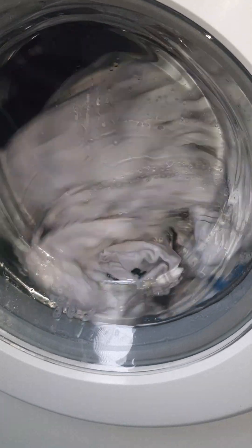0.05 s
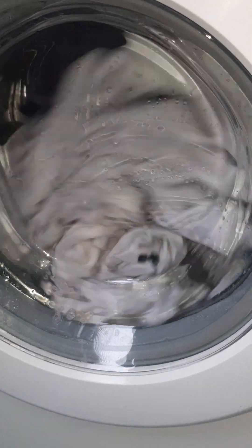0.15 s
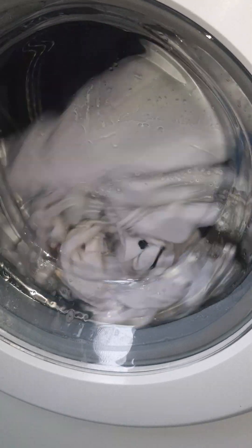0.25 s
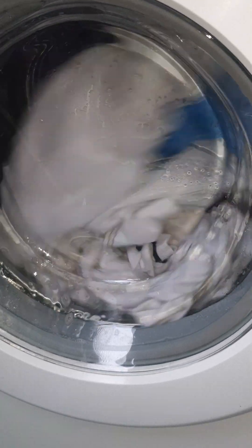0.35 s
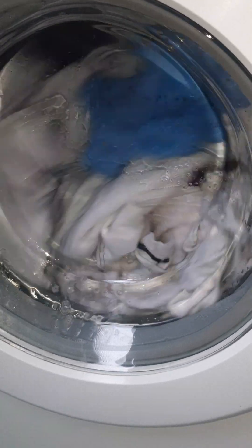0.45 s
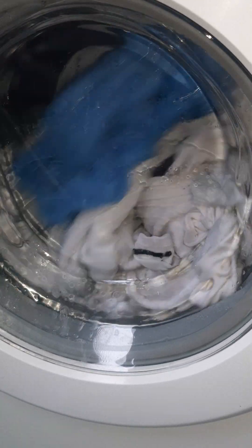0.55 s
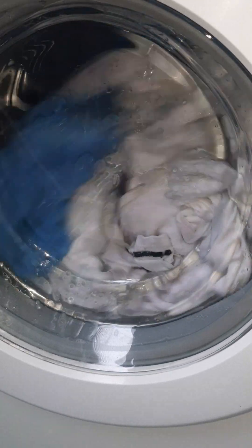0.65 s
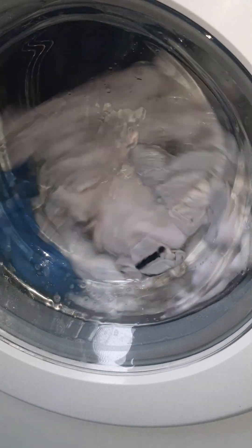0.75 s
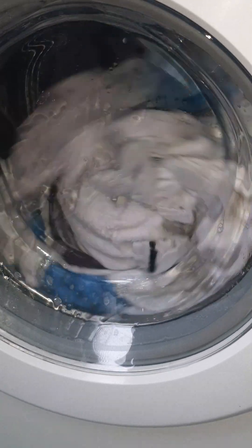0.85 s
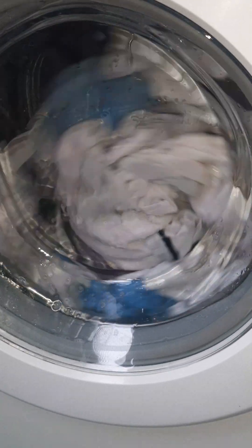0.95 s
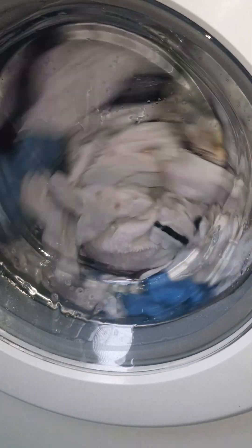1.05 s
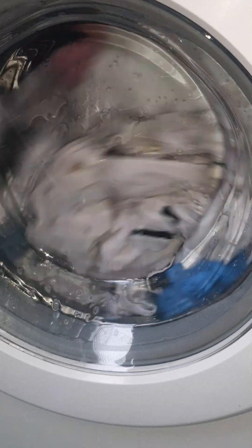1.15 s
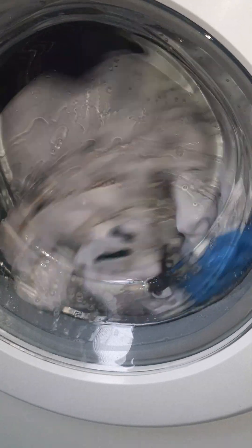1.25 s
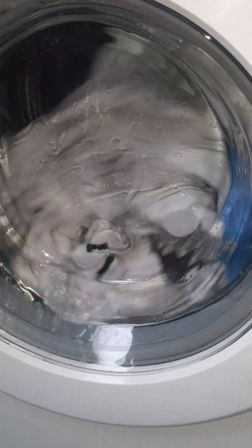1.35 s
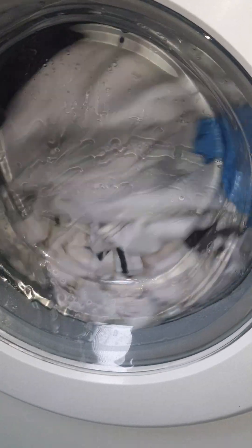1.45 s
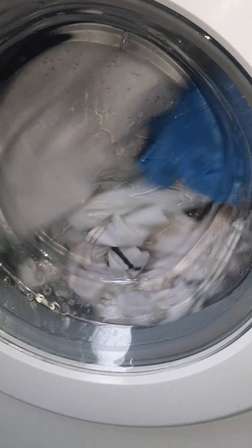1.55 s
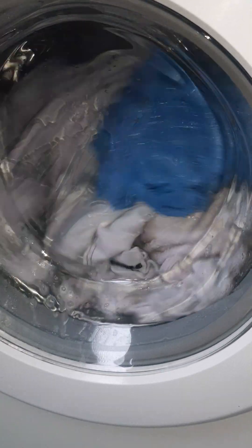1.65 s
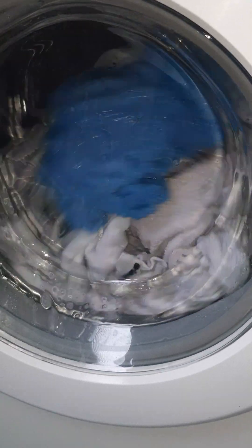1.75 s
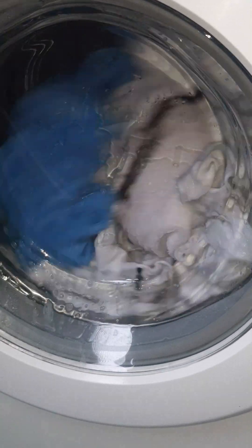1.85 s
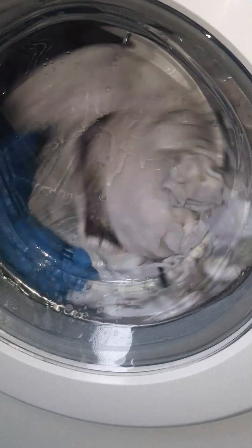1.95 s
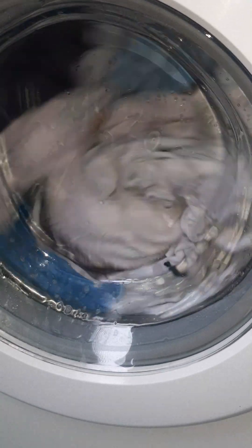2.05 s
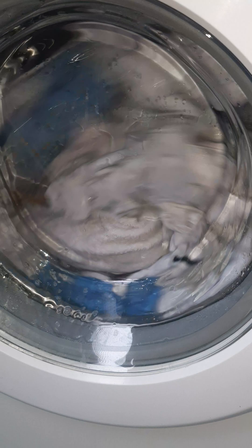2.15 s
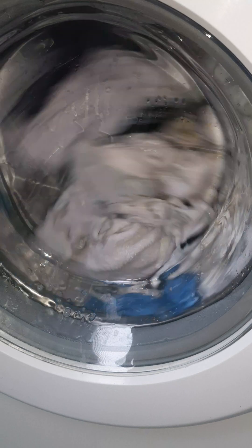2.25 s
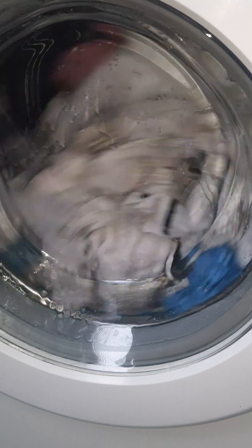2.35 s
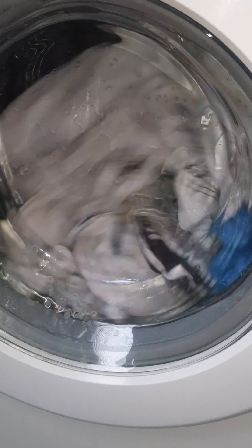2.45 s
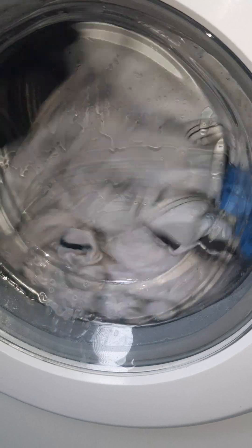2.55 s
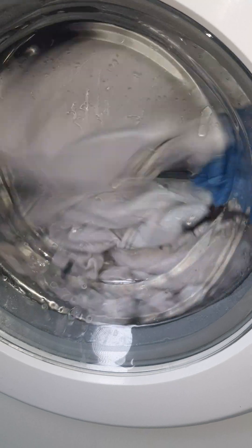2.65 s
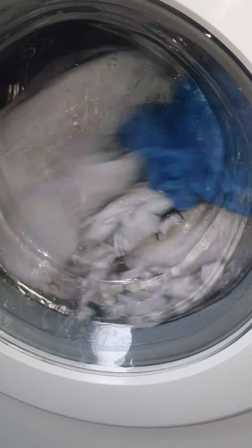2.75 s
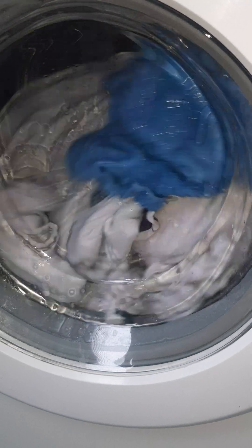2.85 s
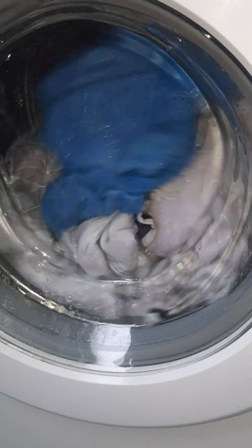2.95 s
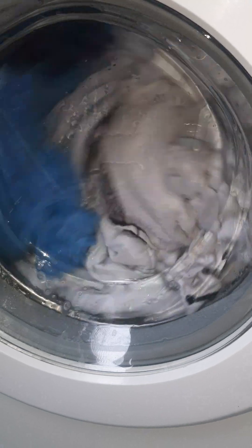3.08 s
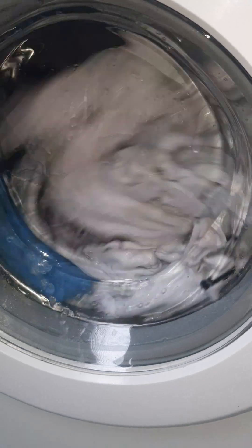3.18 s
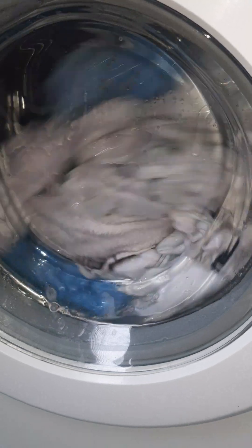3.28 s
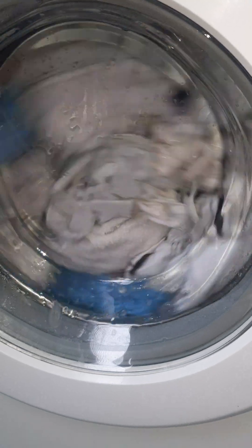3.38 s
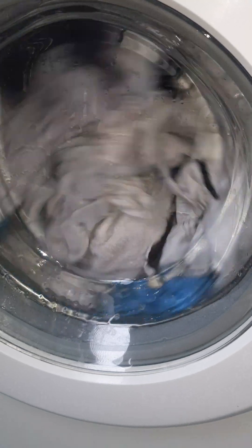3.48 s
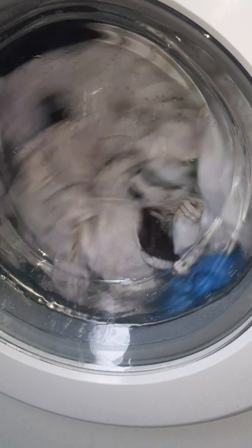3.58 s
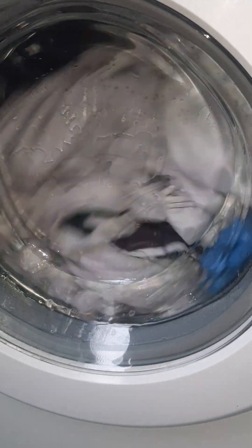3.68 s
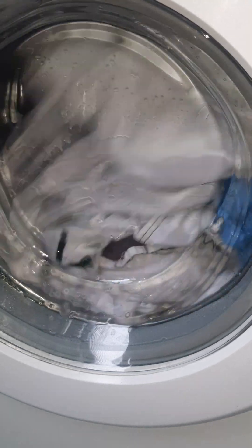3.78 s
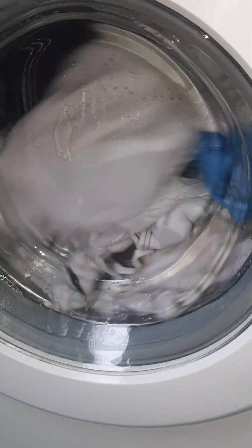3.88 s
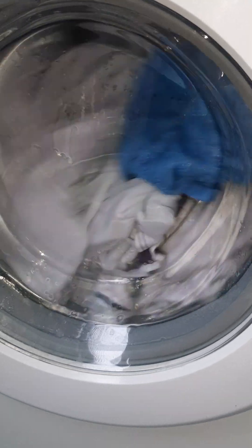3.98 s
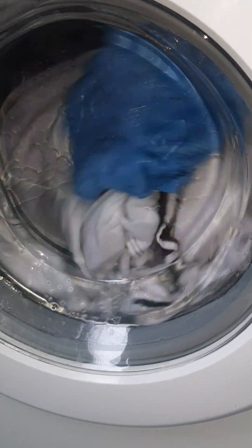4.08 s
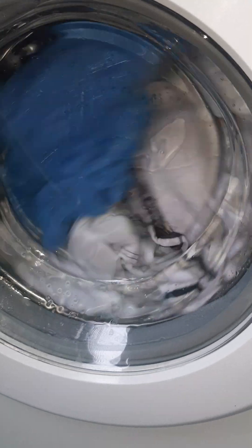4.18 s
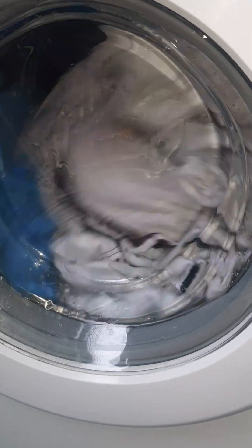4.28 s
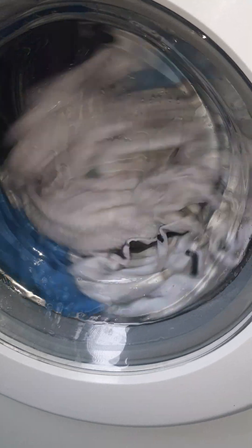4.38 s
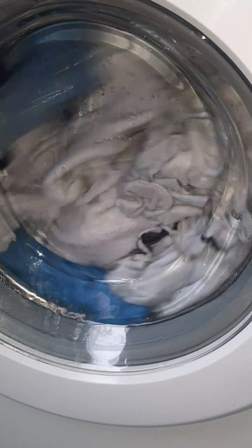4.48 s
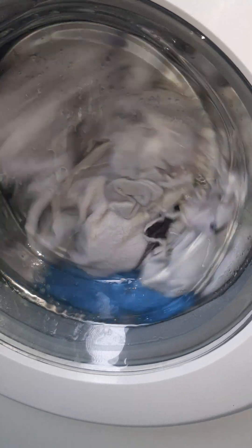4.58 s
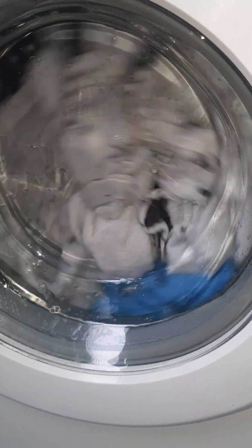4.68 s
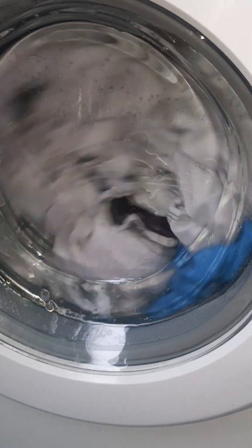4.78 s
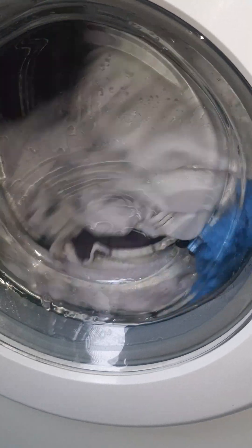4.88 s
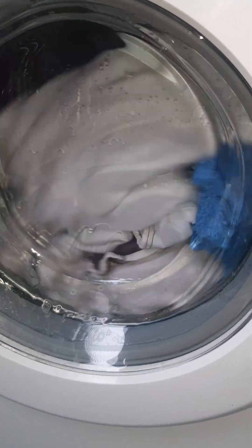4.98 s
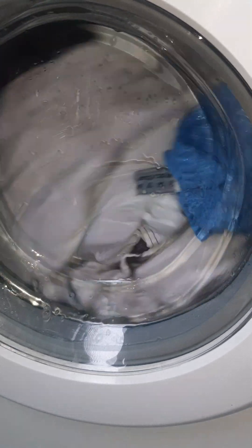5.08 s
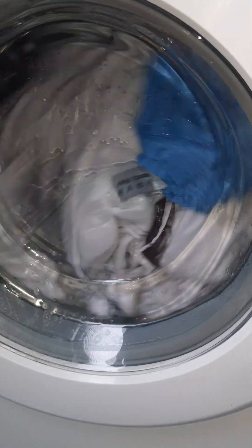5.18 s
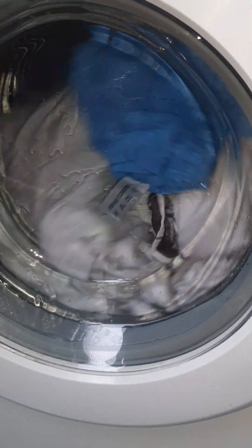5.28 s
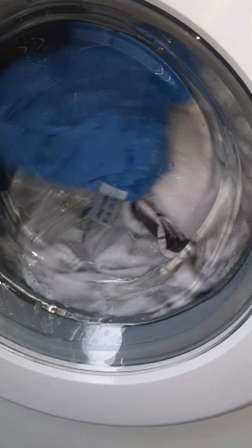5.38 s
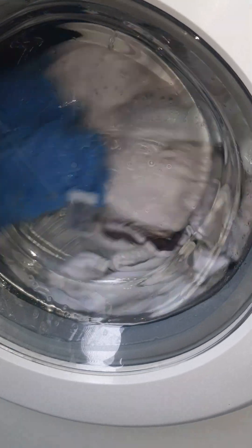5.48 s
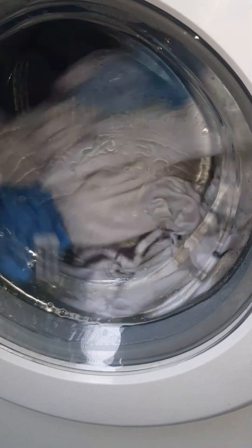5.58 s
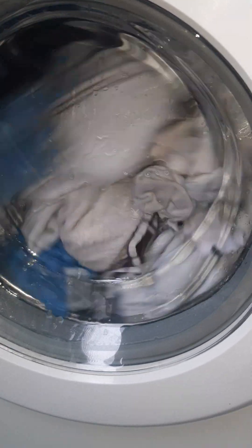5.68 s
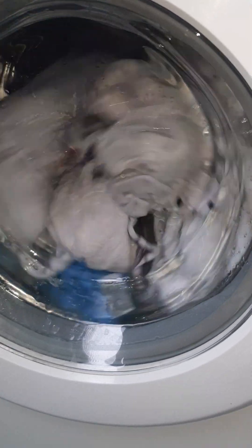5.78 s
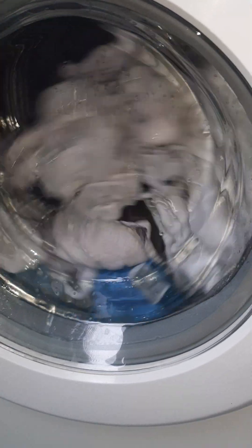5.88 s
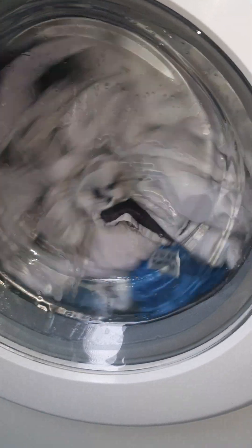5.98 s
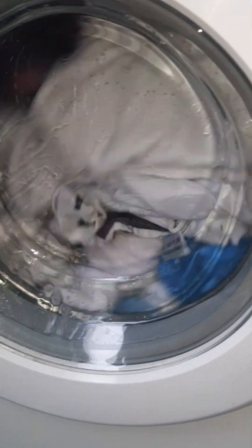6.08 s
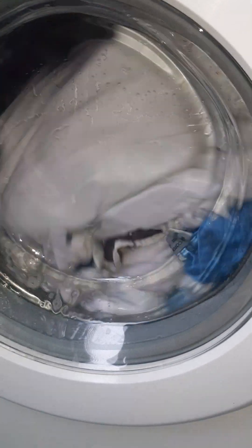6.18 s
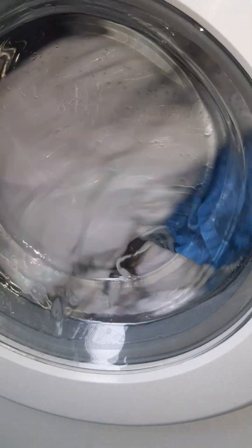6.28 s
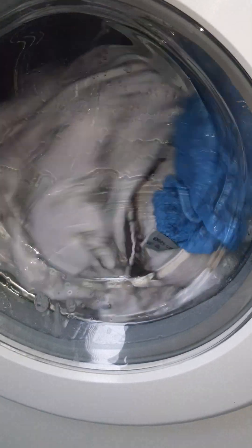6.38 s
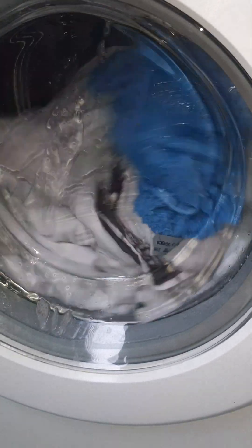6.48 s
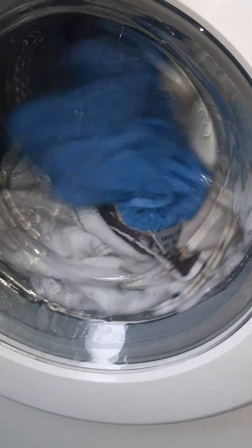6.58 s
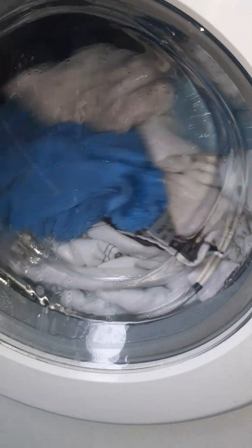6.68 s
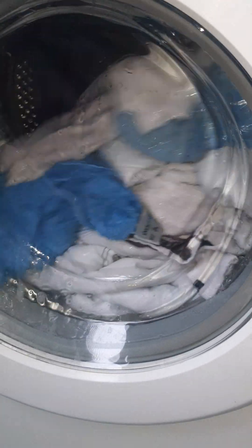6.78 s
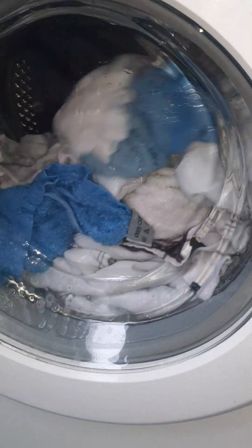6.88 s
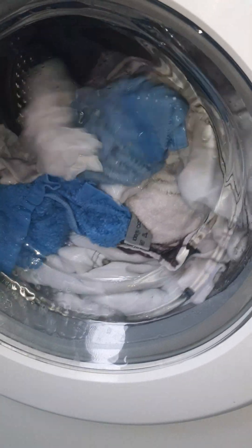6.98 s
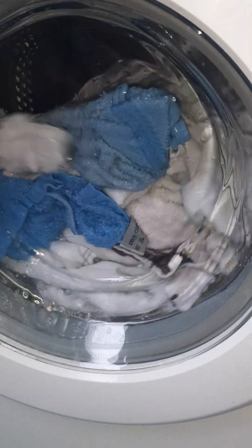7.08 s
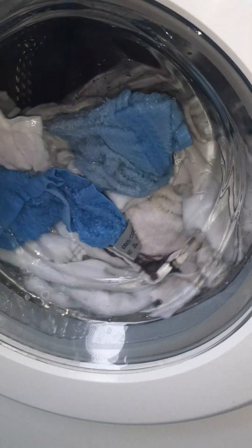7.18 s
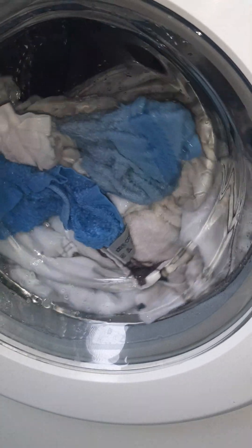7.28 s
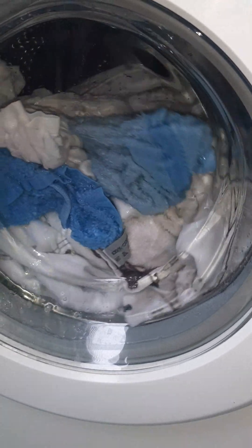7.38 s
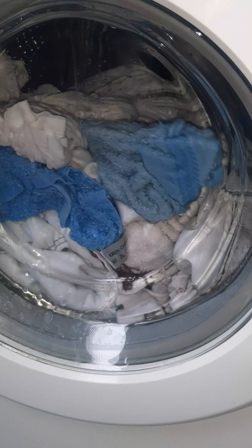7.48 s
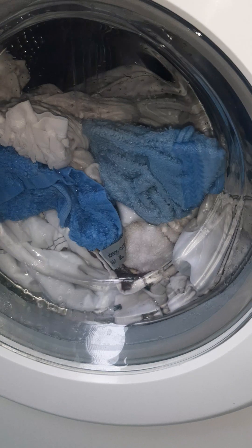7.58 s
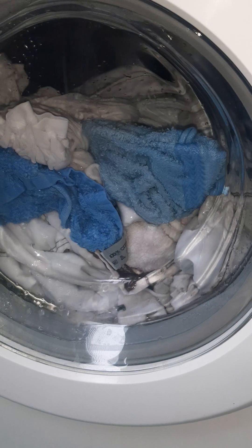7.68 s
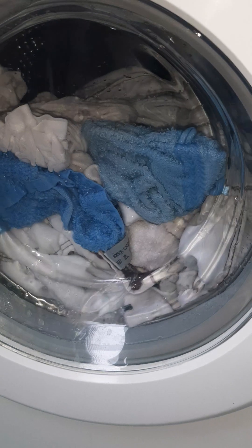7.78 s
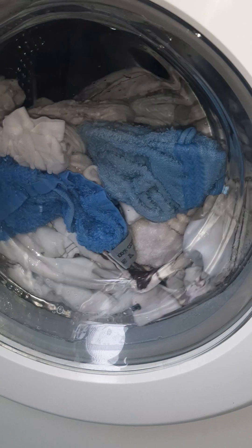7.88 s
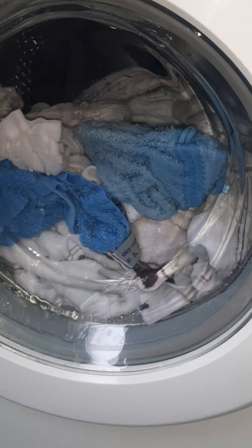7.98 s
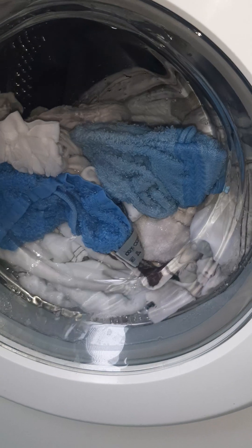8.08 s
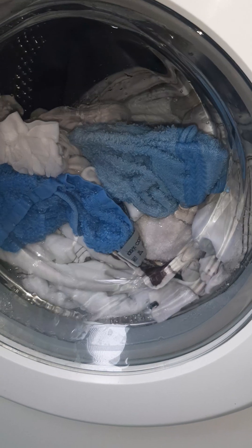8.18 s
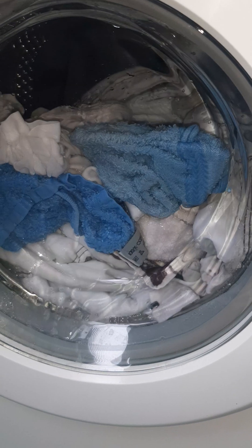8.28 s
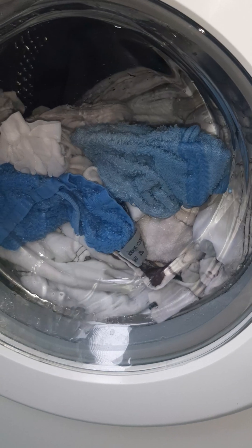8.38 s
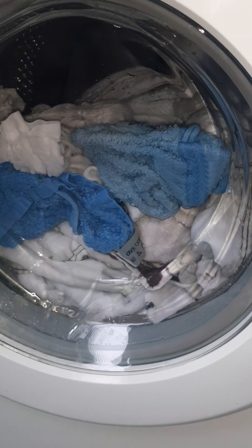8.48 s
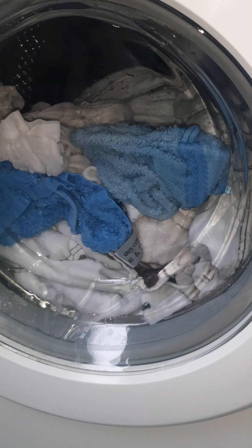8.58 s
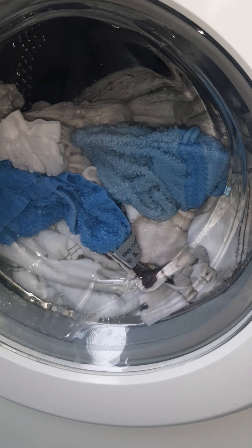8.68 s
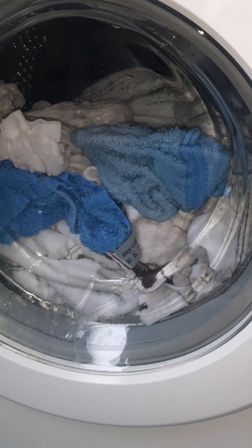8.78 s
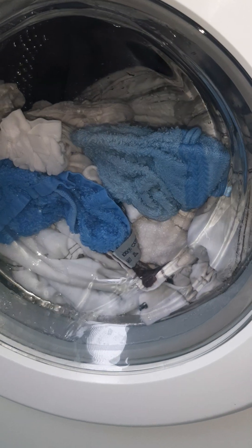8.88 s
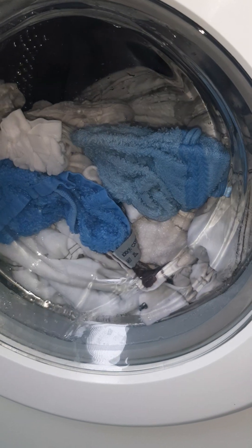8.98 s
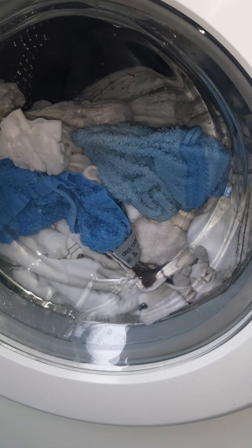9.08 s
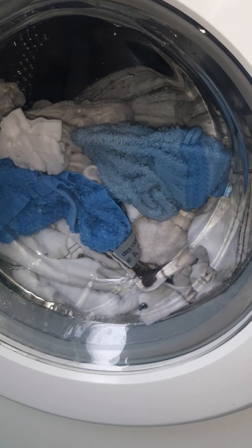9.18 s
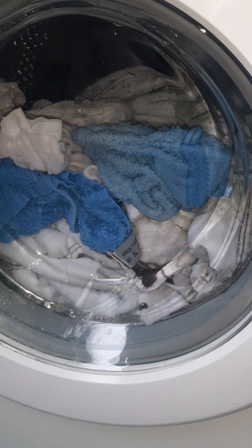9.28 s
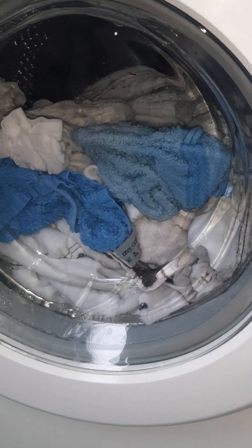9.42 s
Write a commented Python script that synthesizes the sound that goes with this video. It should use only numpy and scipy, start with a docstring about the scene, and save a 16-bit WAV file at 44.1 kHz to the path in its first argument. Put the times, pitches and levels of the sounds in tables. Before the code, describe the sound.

Close, wide stereo sound of a front-loading washing machine indoors. From 0 to about 6.6 seconds a low electric hum wavers gently, with a fuzzy thin whine above it. Wet laundry rolls continuously: lumpy bass rumble, watery slosh, cloth rubbing steel, and irregular slaps. Heavier landings ring the drum with dull, hollow thuds several times a second, strong near 2.0, 3.2 and 5.2 seconds. Short, very high rough squeaks recur throughout, with occasional sharp wet ticks. Around 6.6 seconds the motor cuts; the tub gives soft low shudders and the last clothes flop down by 6.8. Faint bright fizz peaks around 7 and dies away. Quiet room tone remains, with a soft low thump at 7.8, a click at 8.05, a brighter click at 8.54, and faint puffs of hiss near 8.0, 8.5, 9.0 and 9.4.

```python
"""Front-loading washer coasting to a stop

Wet laundry tumbles close to the door glass: filtered noise rumbles and sloshes, damped modes ring the drum.
The motor hums in sines on multiples of twice the mains rate, with a fuzzy whine; narrow noise squeaks very
high, and ticks snap and ring. The motor cuts, the tub shudders, the load settles and fizzes, and a quiet room
of shaped noise is left with one low thump, two clicks and four faint puffs of hiss."""
import sys
import numpy as np
from scipy import signal
from scipy.io import wavfile
from scipy.ndimage import uniform_filter1d

SR = 44100
rng = np.random.default_rng(int(sys.argv[2]) if len(sys.argv) > 2 else 0)


def wav_out(sig):
    """Save sig, one row per channel (or a flat mono array), as 16-bit PCM at SR to the path in sys.argv[1]."""
    wavfile.write(sys.argv[1], SR, np.round(np.clip(np.atleast_2d(sig).T, -1, 1) * 32767).astype(np.int16))


N = 416744

# Spectra give relative levels; each noise is scaled to its own level afterwards.
# stereo picture of noise: likeness of the channels: pitch_hz, likeness (0 to 1)
LIKENESS = [(50, 0.9985), (140, 0.96), (300, 0.74), (550, 0.57), (900, 0.016), (1800, 0.24), (3500, 0.11),
            (15000, .05)]
# balance: pitch_hz, left_over_right_db
BALANCE = [(60, -3), (130, -2), (290, -4), (640, -3), (1410, 0.5), (3100, -4), (6820, 1), (15000, 1)]
# phase: pitch_hz, left_lead_rad
LEFT_LEAD = [(50, 0.98), (600, -0.4), (900, -0.63), (1100, -3), (1800, -3.5), (2300, -7), (4000, -8.)]

# room tone: pitch_hz, level_db (per Hz)
ROOM_SPECTRUM = [(15, -47), (25, -20), (113, -4), (184, -12), (299, 1), (500, -7.5), (588, 0), (770, -9),
                 (858, 0), (1250, -2.5), (1640, -7.5), (2530, -9.5), (3200, -20), (4450, -17.5),
                 (5380, -25), (15800, -41)]
ROOM_DB = -64.5
# puffs of hiss: top_s, rise_s, fall_s (10 dB below the top), level_db
HISS_PUFFS = [(7.96, .12, 0.35, -72), (8.52, 0.062, .25, -71.5), (8.97, 0.05, .1, -82),
              (9.42, .11, .2, -73)]
# low thump: top, levels of tone and noise, times to 10 dB below the top
THUMP_S, PUSH_DB, BODY_DB, THUMP_RISE_S, THUMP_FALL_S = 7.8, -53, -55, 0.072, 0.1

# clicks: start_s, level_db (of the whole click), tilt_db (per octave about 1 kHz), bass_db (before a
# 10.5 dB cut), tail_t60_s, struck_hz (pitch struck most)
CLICK_EVENTS = [(8.05, -36, 0, 5, 0.38, 2120), (8.541, -34.5, 3.5, -2.5, 0.34, 5600)]
# tail of a click before its tilt: pitch_hz, level_db (per Hz)
CLICK_SPECTRUM = [(290, -29), (500, -4), (945, -3), (1140, -7), (1540, -7.5), (2090, -5.5), (2960, -16),
                  (5130, -12), (7800, -27.5), (12200, -30.5), (15800, -36)]
# modes of the clicking part: pitch_hz, level_db (before tilt and strike), t60_s
CLICK_MODES = [(730, 0, 0.14), (900, -5.5, 0.19), (2065, -5, 0.059), (3200, -18, 0.11), (3970, -9, 0.084),
               (4900, -13, 0.11), (5600, -7, 0.059)]

# the tub rocks on its springs as power cuts: start_s, peak_db, pitch_hz, t60_s
TUB_SHUDDERS = [(6.6, -35, 123, 0.15), (6.835, -45, 62, 0.16)]

# sharp wet ticks: start_s, snap_db (6 dB above its rms before the fade), ring_hz, ring_peak_db
TICK_EVENTS = [(0.6709, -58, 7800, -58), (1.3937, -46, 5600, -53), (1.584, -56, 2240, -45),
               (1.6746, -51, 5400, -61), (2.5457, -44, 5600, -57), (2.6823, -54, 9200, -62),
               (2.722, -60, 2330, -43.5), (2.7467, -51, 4270, -56), (3.2, -47, 3880, -44.5),
               (5.431, -51, 4600, -50), (5.667, -52, 2440, -46.5), (6.1499, -45, 3930, -48),
               (6.219, -58, 2200, -50)]
TICK_RING_T60_S = 0.057

# high squeaks: start_s, level_db (5.5 dB above the burst's rms before its fade), pitch_hz (at the start)
SQUEAK_EVENTS = [(0.3526, -52, 12810), (0.4194, -53, 13000), (1.0136, -49, 13500), (1.0964, -54, 12400),
                 (2.6738, -53, 12500), (3.6177, -55, 12800), (4.0721, -51, 12390), (4.4218, -52, 12590),
                 (1.234, -45, 12900), (1.291, -50, 12800), (1.7155, -50, 12490), (1.7853, -42, 13100),
                 (1.8532, -44.5, 12800), (2.0453, -52, 12800), (2.1141, -50, 12500), (2.4194, -49, 13100),
                 (2.5471, -52, 12000), (2.7911, -50, 13200), (2.9951, -45, 13600), (3.0614, -45.5, 13000),
                 (3.683, -49, 12400), (3.7519, -50, 13000), (3.8117, -47, 12800), (4.0033, -46, 12900),
                 (4.3715, -47, 12800), (4.5545, -51, 13400), (5.1233, -46, 13000), (5.445, -54, 12200),
                 (6.079, -42.5, 12800)]

# hum levels until the power cuts, before sways and waver:
# time_s, second_multiple_db, first_multiple_db
HUM_LEVELS = [(0, -36, -45), (.35, -35.5, -41.5), (.78, -34.5, -42), (.93, -36.5, -45), (1.2, -33.5, -38),
              (1.55, -38, -46), (1.9, -35, -42), (2.3, -35.5, -42.5), (2.8, -35.5, -43), (3.1, -35.5, -40),
              (3.55, -37.5, -46), (3.9, -35, -37.5), (4.3, -35.5, -46), (4.46, -36, -38.5),
              (4.75, -33, -41.5), (5.0, -37.5, -45), (5.3, -35.5, -43), (5.75, -35.5, -43.5),
              (6.0, -35.5, -44), (6.3, -33.5, -45), (6.54, -39.5, -43.5), (6.63, -46, -45)]
# one row per multiple of the hum: left_over_right_db, left_lead_rad
HUM_STEREO = [(0.5, 0.15), (3.5, 0.25), (-10.5, 0.32), (-7, .05)]
# chance wavering of each multiple: rms_db
HUM_WAVER_DB = [1.4, 1.16, 3.6, 2.34]
# sway of the first multiple, keyed by times per drum turn: depth_db, first_top_s
FIRST_SWAY = {2: (2.2, 0.11), 3: (.9, -.01), 4: (1.572, -.09)}
# brush whine: pitch_hz, width_hz, level_db (per Hz)
BRUSH_WHINE = [(3285, 103, 3.5), (3100, 47, 1.5), (1955, 80, 0), (8380, 83, -10.5)]
MAINS_TWICE_HZ = 100.05
THIRD_DB, FOURTH_DB = -52.5, -49.5  # before swing and waver
FOLLOW = 0.2  # share of the second multiple's swing that multiples 3 and 4 follow
SWELLS_PER_S, SWELL_TOP_S, SWELL_DB = 1.97, 0.1, 2  # perhaps once per trip of the belt
WHINE_WAVER_DB = 2  # rms of the chance wavering

# rolling load: time_s, rumble_db, slosh_db (before its sway)
TUMBLE_LEVELS = [(0.0, -52, -43.5), (0.5, -47, -46.5), (1.12, -53, -43.5), (1.39, -45.5, -46.5),
                 (1.85, -49.5, -45.5), (2.7, -51, -45.5), (2.9, -53, -47), (3.3, -49, -46),
                 (3.7, -50, -47.5), (4.05, -45.5, -46), (4.35, -48.5, -45.5), (5.0, -46, -46),
                 (5.21, -46.5, -46.5), (5.47, -48.5, -47), (6.01, -45.5, -48.5), (6.39, -49, -44.5),
                 (6.65, -51, -51.5), (6.88, -72, -59.5), (7.1, -68, -75.5), (7.3, -88, -70)]
# bass of the rolling load: pitch_hz, level_db (per Hz)
RUMBLE_SPECTRUM = [(25, -44), (45, -44), (62, 4), (80, 5.5), (100, -27), (130, -37.5)]
# slosh and rub on the drum: pitch_hz, level_db (per Hz)
SLOSH_SPECTRUM = [(70, -48), (95, -4.5), (120, 11), (140, -1), (165, -21), (188, 4.5), (230, -2.5),
                  (270, -0.5), (325, 1), (360, -7), (453, -14), (590, -3), (1090, -14.5), (1530, -18),
                  (2200, -18.5), (2850, -25), (3570, -24), (4770, -29.5), (9740, -39), (12400, -37),
                  (15800, -56)]
# sway of the slosh, keyed by times per drum turn: depth_db, first_top_s
SLOSH_SWAY = {4: (0.29, -0.07)}
DRUM_TURNS_PER_S = 0.845
FLOPS_PER_S, FLOPS_DB, FLOP_SPREAD_DB, FLOP_T60_S = 25, -11.5, 5.5, 0.28  # irregular slaps; relative to the slosh
TAPS_PER_S, TAPS_DB, TAP_SPREAD_DB = 130, -12, 4.5  # soft taps of cloth; relative to the slosh

# laundry landing on the drum: start_s, level_db (ring peak before lumps and balance),
# low_struck_hz, high_struck_hz, brightness_db (-18.5 leaves the upper modes as they are), splash_t60_s
LANDINGS = [(0.09, -36.5, 900, 1300, -21, .3), (0.553, -27.5, 536, 1580, -11, 0.38),
            (1.016, -28.5, 590, 1330, -10, 0.11), (1.102, -38, 700, 1640, -8, 0.24),
            (1.254, -33, 573, 1390, -19, 0.16), (1.684, -32, 570, 2300, -9, .4),
            (2.012, -24, 545, 2220, -22, 0.43), (2.213, -30, 600, 2190, -23, 0.11),
            (2.449, -33.5, 547, 2410, -15, 0.18), (2.773, -30, 595, 1750, 3.5, 0.15),
            (2.917, -31.5, 580, 1390, -29, 0.1), (3.2, -23.5, 554, 2080, -9, 0.37),
            (3.757, -31.5, 590, 2200, -28, 0.15), (4.072, -30.5, 546, 2230, -21, 0.38),
            (4.097, -28.5, 460, 2380, -22, 0.26), (4.309, -37, 600, 1180, -21, 0.47),
            (4.369, -28, 560, 1570, -10, 0.33), (4.552, -31, 597, 1450, -21, 0.41),
            (4.604, -27.5, 770, 1450, -11, 0.55), (4.811, -30.5, 570, 1240, -27, 0.11),
            (4.914, -28.5, 605, 1370, -12, 0.25), (5.099, -29.5, 520, 2150, -17, 0.33),
            (5.2445, -22.5, 580, 2200, -21, 0.23), (5.571, -27, 580, 2200, -19, 0.41),
            (5.583, -25.5, 530, 2190, -26, .5), (5.79, -31, 580, 2110, -9, 0.91),
            (6.04, -45, 580, 1400, -19, 0.17), (6.147, -28, 573, 1980, -6, 0.33),
            (6.324, -29, 570, 1270, -41, 0.14), (6.541, -39.5, 920, 1230, -13, 0.31),
            (6.659, -31.5, 565, 2200, -31, 0.084), (6.698, -50, 576, 1300, -24, .1),
            (6.736, -34, 920, 2170, -26, 0.74), (6.79, -40.5, 920, 1390, -22, 0.44)]
# drum modes: pitch_hz, level_db (before lift and scatter), t60_s
DRUM_MODES = [(306, -9, .1), (435, -1, 0.14), (545.5, 0.5, 0.18), (580, 5, 0.14), (706, 1, 0.23),
              (946, 4, 0.15), (1324, -6.5, 0.11), (1496, -11.5, .06), (1764, -7, 0.046), (1880, -20, .07),
              (2228, -13.5, 0.14), (2430, -10.5, 0.1), (3260, -24, .1), (3840, -29, 0.087)]
# wet slap: pitch_hz, level_db (per Hz)
SPLASH_SPECTRUM = [(200, -2), (400, -3), (600, 0), (1100, -6.5), (2300, -15), (3200, -25.5), (15800, -38.5)]
BLOW_RISE_S, SPLASH_RISE_S = 0.00089, 0.0095  # wet cloth lands softly
GATHER_S, GATHER_DB = 0.024, -5.5  # its edge touches first: time per 10 dB of build-up, level at the landing
LUMPY = 0.3  # a wet load lands in lumps, which roughens the ring

EDGE_HZ = 15790  # top of the treble


def gain_of(db):
    """Decibels to gain."""
    return 10 ** (np.asarray(db) / 20)


def evened(x):
    """Scales to rms 1."""
    return x / np.sqrt(np.mean(x ** 2) + 1e-20)


def read(points, hz):
    """Reads a spectrum on a log-frequency axis."""
    f, value = np.transpose(points)
    return np.interp(np.log(hz + 1), np.log(f + 1), value)


def curves(rows):
    """Columns of a table at every sample, after a gate that is open over the table's span."""
    s, *columns = np.transpose(rows)
    t = np.arange(N) / SR
    # 40 ms ramps, left out where the span meets an end of the scene
    since_start = t - s[0] + (s[0] < 0.01)
    until_end = s[-1] - t + (s[-1] > 9.4)
    gate = np.clip(np.minimum(since_start, until_end) / 0.04, 0, 1)
    return gate, *(np.interp(t, s, c) for c in columns)


def add(mix, s, sound):
    """Mixes a two-channel sound in at time s."""
    part = mix[:, round(s * SR):][:, :sound.shape[1]]
    part += sound[:, :part.shape[1]]


def noise(points, band=(0, 3e4), patchy_db=0., size=1024, count=N):
    """Stereo noise of a given spectrum in drifting patches; rms about 1 within band."""
    frames, hz = count * 2 // size + 3, np.fft.rfftfreq(size, 1 / SR)
    a, b, c, d, patches = rng.standard_normal((frames, len(hz), 5)).T
    patches = uniform_filter1d(patches, size=10, axis=0)
    patches = evened(uniform_filter1d(patches, size=4, axis=1))
    same = np.clip(read(LIKENESS, hz), 0, 1)[:, None]
    left = a + 1j * b
    right = same * left + np.sqrt(1 - same ** 2) * (c + 1j * d)
    right = right * np.exp(-1j * read(LEFT_LEAD, hz))[:, None]
    lean = gain_of(read(BALANCE, hz) / 2)[:, None]
    shape = gain_of(read(points, hz))
    z = np.array([left * lean, right / lean]) * shape[:, None] * gain_of(patchy_db * patches)
    x = signal.istft(z, window="cosine", nperseg=size, noverlap=size // 2)[1][:, :count]
    inside = (hz >= band[0]) & (hz <= band[1])
    share = np.sum(shape[inside] ** 2) / np.sum(shape ** 2)
    return x / np.sqrt(np.mean(x.mean(0) ** 2) * share)


def peak(hz, width, skirt=0.23):
    """Spectrum of one resonance."""
    below = [(hz - 3 * width, -60), (hz - width, -12), (hz - skirt * width, 0)]
    above = [(hz + skirt * width, 0), (hz + width, -12), (hz + 3 * width, -60)]
    return below + above


def fade(t60, rise, count):
    """Quick rise, then an exponential fall."""
    t = np.arange(count) / SR
    return (1 - np.exp(-t / rise)) * gain_of(-60 * t / t60)


def bell(top_s, rise_s, fall_s):
    """A soft swell, 10 dB down at rise_s before and fall_s after its top."""
    t = np.arange(N) / SR - top_s
    return gain_of(-10 * (t / np.where(t < 0, rise_s, fall_s)) ** 2)


def waver(smooth):
    """Slow chance, rms 1, smoothed twice over the given number of samples."""
    once = uniform_filter1d(rng.standard_normal(N), size=smooth)
    return evened(uniform_filter1d(once, size=smooth))


def sway(per_s, top_s):
    """A slow even swing between -1 and 1."""
    return np.cos(2 * np.pi * per_s * (np.arange(N) / SR - top_s))


def with_drum(orders):
    """Level change in dB that repeats with every turn of the drum."""
    return sum(db * sway(k * DRUM_TURNS_PER_S, s) for k, (db, s) in orders.items())


def near(hz, centre_hz):
    """One at the centre, falling almost to zero a quarter octave away."""
    return np.exp(-(np.log2(hz / centre_hz) / 0.13) ** 2)


def ring(modes, lift_db, count, spread, rise, scatter=1.04):
    """A blow sets every mode going, each a little detuned and with its own phase on the right; peak 1."""
    t, out = np.arange(count) / SR, np.zeros((2, count))
    chance = rng.standard_normal((len(modes), 3))
    for (hz, db, t60), lift, (detune, level, turn) in zip(modes, lift_db, chance):
        phase = np.array([[0], [-read(LEFT_LEAD, hz) + scatter * turn]])
        tone = np.sin(2 * np.pi * hz * (1 + spread * detune) * t + phase)
        out += gain_of(db + lift + 2.0 * level) * fade(t60, rise, count) * tone
    return out / abs(out.mean(0)).max()


def room_tone():
    """Steady shaped noise of the quiet room."""
    return gain_of(ROOM_DB) * noise(ROOM_SPECTRUM, patchy_db=2.0, size=2048)


def hiss():
    """Faint puffs: a band of noise around 4.5 kHz swells and sinks."""
    swells = sum(gain_of(db) * bell(s, rise, fall) for s, rise, fall, db in HISS_PUFFS)
    return swells * noise(peak(4520, 1500))


def fizz():
    """Suds in the resting load: bright noise that dies away."""
    t = np.arange(N) / SR
    suds = noise([(2500, -23), (5000, 5), (15800, -13)])
    return suds * gain_of(-75 - 3.3 * abs(t - 7.)) * (t > 6.7)  # loudest at 7 s


def thump():
    """One soft low thump: a gently wobbling 62 Hz tone and a body of low noise swell together."""
    t = np.arange(N) / SR
    wobble = 0.07 * np.sin(2 * np.pi * 9.5 * t)
    push = np.sqrt(2) * np.sin(2 * np.pi * (62 * t + wobble)) * gain_of([[-3.], [3.]])
    body = noise([(90, -3), (170, -12), (300, -3), (750, -14), (2500, -66)], size=2048)
    swell = bell(THUMP_S, THUMP_RISE_S, THUMP_FALL_S)
    return swell * (gain_of(PUSH_DB) * push + gain_of(BODY_DB) * body)


def clicks():
    """A snap rings a few modes; its bass builds later and the room carries a tail."""
    out, count = np.zeros((2, N)), 16000
    modes_hz = np.array(CLICK_MODES)[:, 0]
    bass_points = [(100, -16), (200, -3.5), (300, 4.0), (420, -1), (600, -2.5), (900, -54)]
    for s, db, tilt_db, bass_db, t60, struck_hz in CLICK_EVENTS:
        tilted = [(f, level + tilt_db * np.log2(f / 1000)) for f, level in CLICK_SPECTRUM]
        tail = noise(tilted, patchy_db=0.5, size=256, count=count) * fade(t60, 0.00058, count)
        bass = noise(bass_points, size=2048, count=count) * fade(0.33, 0.017, count)
        lift_db = tilt_db * np.log2(modes_hz / 1000) + 6 * near(modes_hz, struck_hz)
        modes = ring(CLICK_MODES, lift_db, count, 0.0077, 0.00057, scatter=0.5)
        click = 0.63 * modes + gain_of(-14) * tail + gain_of(bass_db - 10.5) * bass
        add(out, s, gain_of(db) * click)
    return out


def shudders():
    """Soft low swings of the tub: decaying sines."""
    out, count = np.zeros((2, N)), 12000
    for s, db, hz, t60 in TUB_SHUDDERS:
        swing = fade(t60, 0.02, count) * np.sin(2 * np.pi * hz * np.arange(count) / SR)
        add(out, s, gain_of(db) * swing / swing.max() * np.ones((2, 1)))
    return out


def ticks():
    """Drops or fasteners flung on glass and steel: a wide snap with a short tail, and one brief ring."""
    out, count = np.zeros((2, N)), 8000
    snap_points = [(1500, 10), (5500, 12.0), (9000, 7.0), (16000, -10)]
    snaps = noise(snap_points, (5000, 10500), count=count * len(TICK_EVENTS)).reshape(2, -1, count)
    for k, (s, db, hz, ring_db) in enumerate(TICK_EVENTS):
        tone = ring([(hz, 0, TICK_RING_T60_S)], [0], count, 0.0046, 0.0022, scatter=0.4)
        add(out, s, gain_of(db - 6) * snaps[:, k] * fade(0.11, 0.00071, count))
        add(out, s, gain_of(ring_db) * tone)
    return out


def squeaks():
    """Short rough bursts in a narrow, very high band that sag in pitch."""
    out, count = np.zeros((2, N)), 12000
    t = np.arange(count) / SR
    pole = np.exp(-np.pi * 1500 / SR)
    for s, db, hz in SQUEAK_EVENTS:
        z = rng.standard_normal((3, count)) + 1j * rng.standard_normal((3, count))
        both = 0.19 * z[0] + z[1:]  # a small part shared by the channels
        rough = signal.lfilter([1], np.poly([pole, pole, pole]), both)  # three poles set the band width
        burst = (rough * np.exp(2j * np.pi * (hz * t - 1500 * t ** 2))).real
        add(out, s, gain_of(db - 5.5) * evened(burst) * fade(0.26, 0.00056, count))
    return out


def whine():
    """Brushes add fuzzy whines: noise in narrow bands, wavering in level."""
    grid = np.geomspace(1000, 12000, num=1500)
    power = sum(gain_of(2 * db) / (1 + (2 * (grid - f) / w) ** 4) for f, w, db in BRUSH_WHINE)
    fuzz = noise(np.c_[grid, 10 * np.log10(power)], size=2048)
    return gain_of(-60.5 + WHINE_WAVER_DB * waver(smooth=700)) * fuzz


def motor():
    """Magnetic pull pulses twice per mains cycle: four wavering multiples hum under the brush whine."""
    gate, second_db, first_db = curves(HUM_LEVELS)
    second_db = second_db + SWELL_DB * sway(SWELLS_PER_S, SWELL_TOP_S)
    first_db = first_db + with_drum(FIRST_SWAY)
    swing_db = FOLLOW * (second_db - np.median(second_db))
    levels = [first_db, second_db, THIRD_DB + swing_db, FOURTH_DB + swing_db]
    turn = 2 * np.pi * MAINS_TWICE_HZ * np.arange(N) / SR
    side = np.array([[.5], [-.5]])  # half of each stereo difference to left and right
    out = whine()
    for k, db in enumerate(levels):
        lean_db, lead = HUM_STEREO[k]
        gain = np.sqrt(2) * gain_of(db + HUM_WAVER_DB[k] * waver(smooth=3000) + side * lean_db)
        out += gain * np.sin((k + 1) * turn + side * lead + 2 * np.pi * rng.random())
    return gate * out


def chance_hits(per_s, spread_db):
    """Impulses at random times, with sizes spread upward in dB."""
    sizes = gain_of(spread_db * np.minimum(rng.exponential(1, N), 4))
    return sizes * (rng.random(N) < per_s / SR)


def flops():
    """Small irregular slaps: chance hits with soft decays shape splash noise."""
    hits = chance_hits(FLOPS_PER_S, FLOP_SPREAD_DB)
    envelope = signal.oaconvolve(hits, fade(FLOP_T60_S, 0.016, count=12000))[:N]
    return evened(envelope) * noise(SPLASH_SPECTRUM, (700, 9000))


def taps():
    """Many small contacts, each setting one drum mode ringing."""
    out, count = np.zeros((2, N)), 6000
    hits = chance_hits(TAPS_PER_S, TAP_SPREAD_DB)
    which = rng.integers(len(DRUM_MODES), size=N)
    for k, mode in enumerate(DRUM_MODES):
        lift_db = mode[1] + 7 * (mode[0] > 1100)
        tone = ring([mode], [0], count, 0.003, 0.004, scatter=0.4)
        out += gain_of(lift_db) * signal.oaconvolve((hits * (which == k))[None], tone)[:, :N]
    return evened(out)


def tumble():
    """The load rolls (lumpy bass), water and cloth slide over the steel (wide hiss) and flop about."""
    gate, rumble_db, slosh_db = curves(TUMBLE_LEVELS)
    low = gain_of(rumble_db) * noise(RUMBLE_SPECTRUM, (45, 88), size=4096)
    wash = noise(SLOSH_SPECTRUM, (700, 9000), patchy_db=2.0, size=2048)
    wash = wash + gain_of(FLOPS_DB) * flops() + gain_of(TAPS_DB) * taps()
    return gate * (low + gain_of(slosh_db + with_drum(SLOSH_SWAY)) * wash)


def knocks():
    """Each landing rings the drum, most near the struck pitches; its splash gathers before and dies after."""
    out, count, lead = np.zeros((2, N)), 12000, 4000
    modes_hz = np.array(DRUM_MODES)[:, 0]
    length = lead + count
    splash = noise(SPLASH_SPECTRUM, patchy_db=2.0, size=512, count=length * len(LANDINGS))
    splash = splash.reshape(2, -1, length)
    rough = uniform_filter1d(rng.standard_normal((len(LANDINGS), count)), size=200, axis=1)
    lumps = 1 + LUMPY * evened(rough)
    gather = gain_of(GATHER_DB) * fade(6 * GATHER_S, 0.001, lead)[::-1]
    let_go = gain_of(GATHER_DB) * fade(0.05, 1e-5, count)  # carries the gathered level past the landing
    for k, (s, db, low_hz, high_hz, bright_db, t60) in enumerate(LANDINGS):
        lift_db = (bright_db + 18.5) * (modes_hz > 1100)
        lift_db = lift_db + 11 * near(modes_hz, low_hz) + 13 * near(modes_hz, high_hz)
        shape = np.r_[gather, fade(t60, SPLASH_RISE_S, count) + let_go]
        gain = gain_of(db) * gain_of([[-1.3], [1.3]])
        add(out, s, gain * ring(DRUM_MODES, lift_db, count, 0.012, BLOW_RISE_S) * lumps[k])
        add(out, s - lead / SR, gain * gain_of(-10.0) * splash[:, k] * shape)
    return out


def scene():
    """All sources, left and right."""
    background = room_tone() + hiss() + fizz() + thump() + clicks()
    details = shudders() + ticks() + squeaks()
    return background + details + motor() + tumble() + knocks()


def record(dry):
    """A steep low-pass ends the treble."""
    kernel = signal.firwin(1023, EDGE_HZ, window=("kaiser", 10), fs=SR)
    return signal.oaconvolve(dry, kernel[None], "same")


dry = scene()
out = record(dry)
wav_out(out)
```